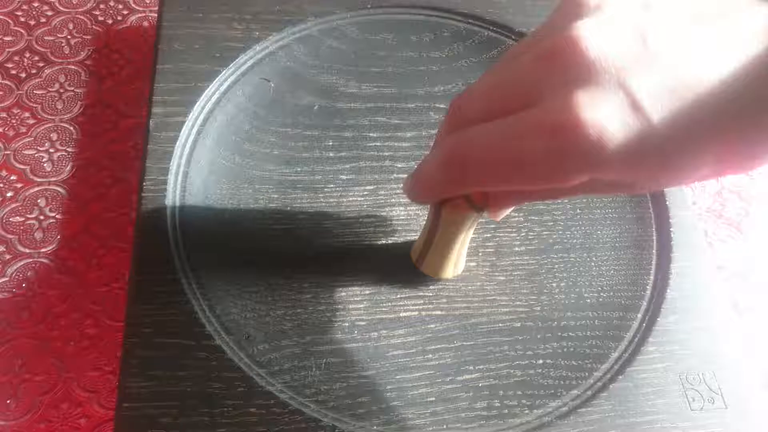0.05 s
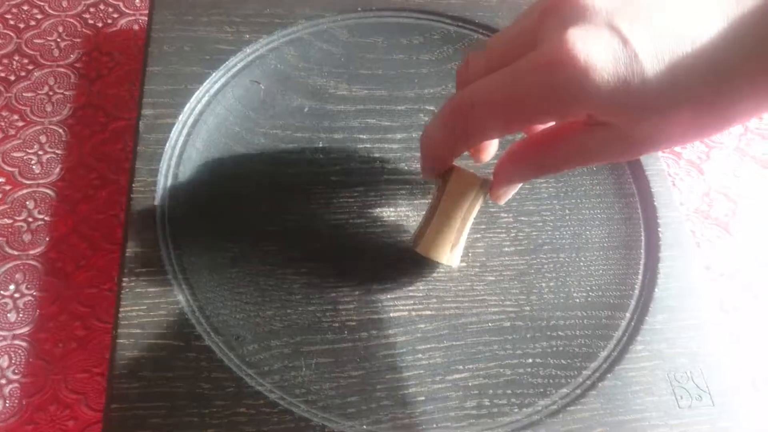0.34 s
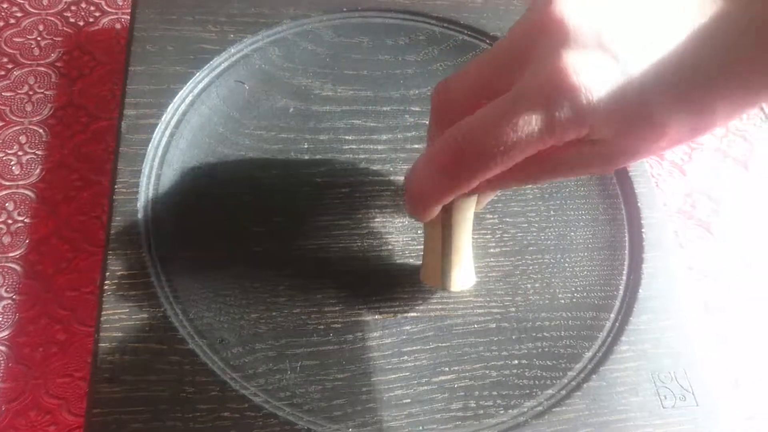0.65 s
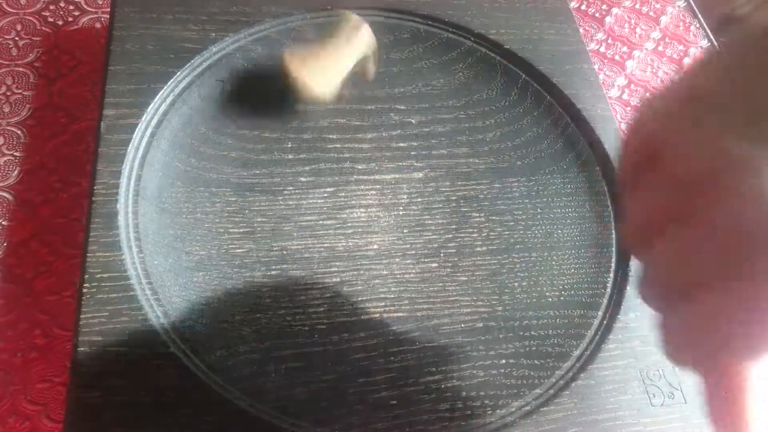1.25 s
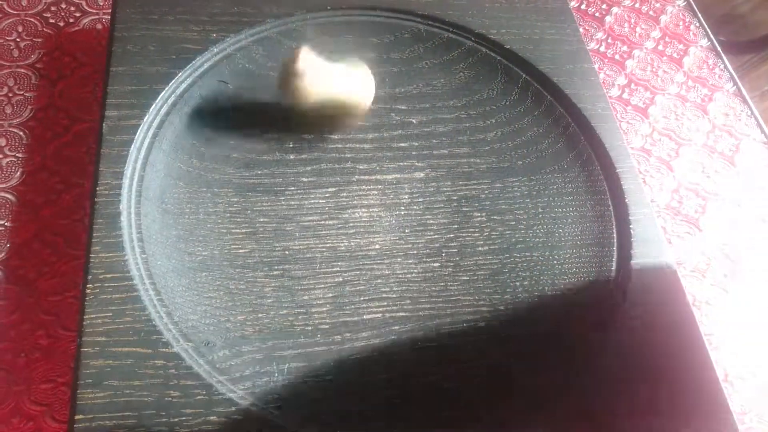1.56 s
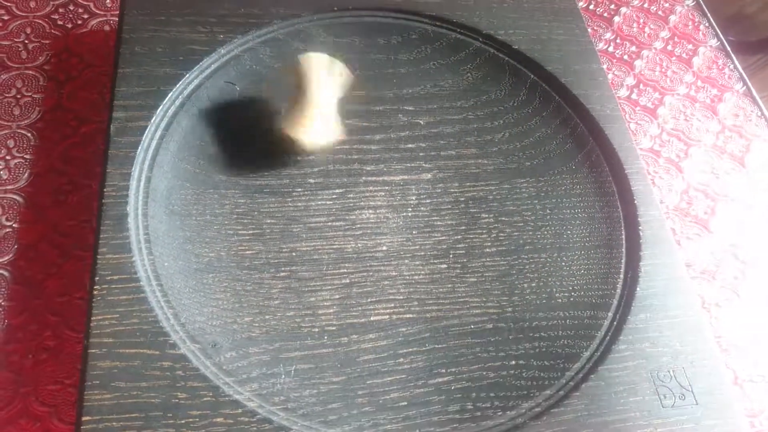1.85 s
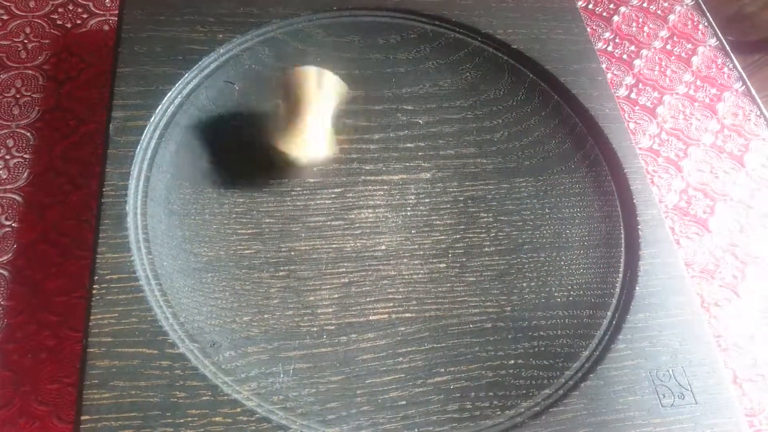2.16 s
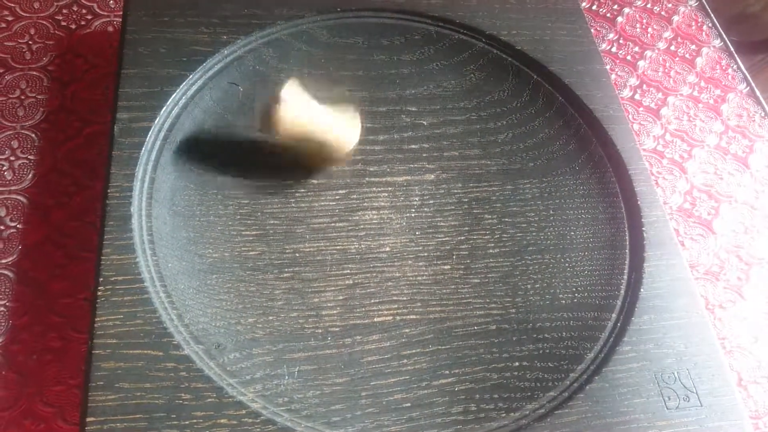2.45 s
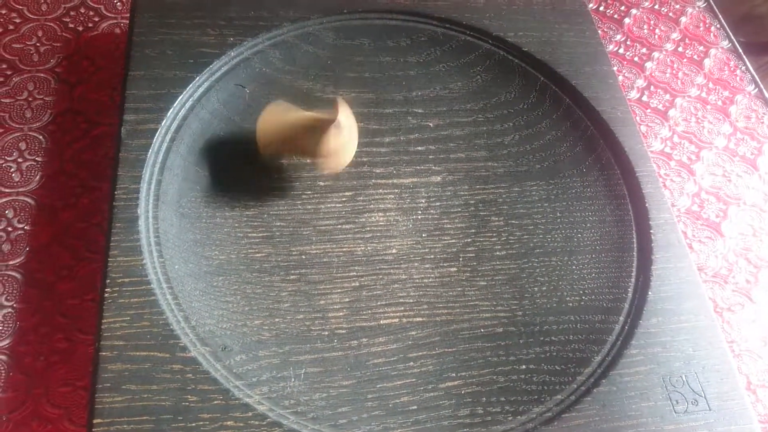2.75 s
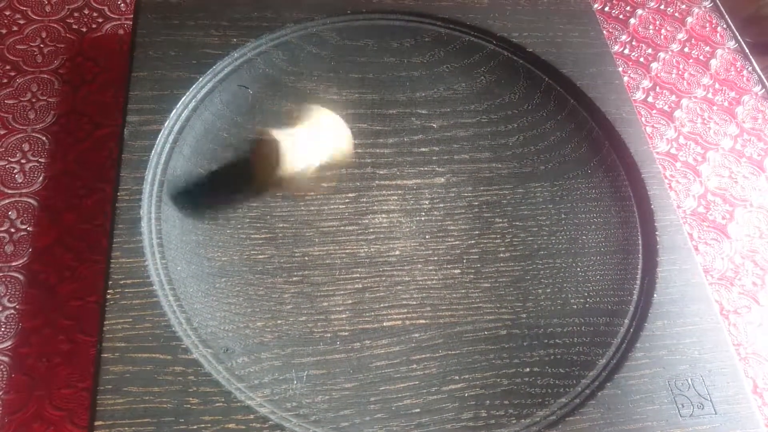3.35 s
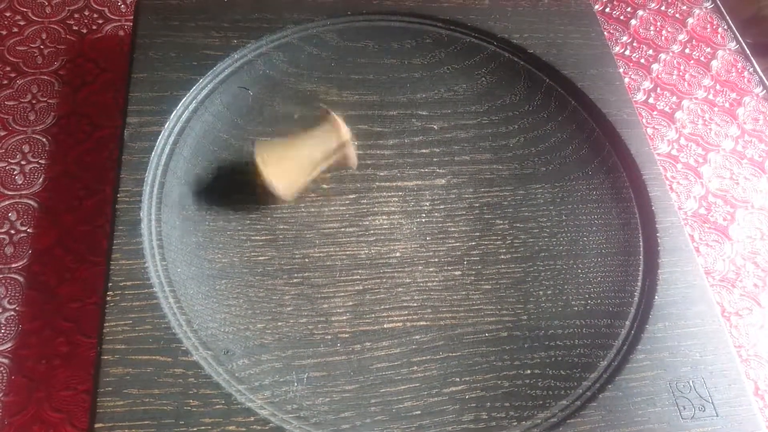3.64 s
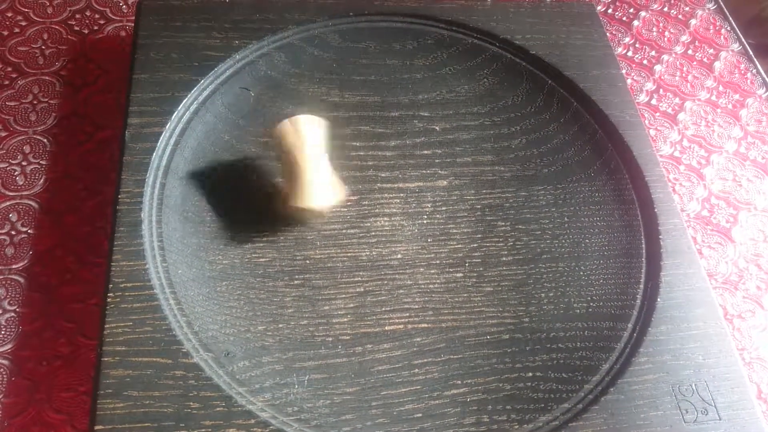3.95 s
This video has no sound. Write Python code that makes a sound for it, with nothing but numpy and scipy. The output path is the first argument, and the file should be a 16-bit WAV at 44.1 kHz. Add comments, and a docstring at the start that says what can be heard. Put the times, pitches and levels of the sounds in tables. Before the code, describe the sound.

Close to the microphone in a quiet room, a wooden top clatters on a wooden plate. Faint finger rubs come first, then three sharp knocks as it lands, followed by quick, uneven tapping as it tumbles around.

```python
"""A small waisted wooden top, flicked by the fingers on a hard wooden plate on a table, close to the
microphones and to the right. After a few soft nudges and rubs it lands with three sharp knocks, then
tumbles round on its rims, tapping and rolling. Every contact rings the top briefly and the plate and
table for longer. Behind it lies a quiet small room with a short tail and a faint hum."""
import sys
import numpy as np
from scipy import signal
from scipy.fft import rfft, irfft
from scipy.io import wavfile

SR = 44100
rng = np.random.default_rng(int(sys.argv[2]) if len(sys.argv) > 2 else 0)


def digitize_waveform(pressure):
    """Quantize a signal to 16-bit integers and store it at the path in sys.argv[1].

    Rows of a 2-D input are taken as channels; values are limited to [-1, 1].
    """
    field = np.atleast_2d(pressure).T
    bounded = np.clip(field, -1, 1)
    quanta = np.round(bounded * 32767).astype(np.int16)
    wavfile.write(sys.argv[1], SR, quanta)


N = 176400
TIME = np.arange(N) / SR

# Room tone. Each row: frequency in Hz, relative spectral level in dB.
ROOM_TONE = [(15, -43), (29, -47), (46, -6), (80, -2), (115, -6), (170, -15), (400, -23), (750, -25.5),
             (1200, -33), (3000, -32.5), (5800, -32), (9000, -36), (15000, -40.5)]
# Faint hum. Each row: frequency in Hz, level in dB.
HUM = [(49, -67), (81, -66)]
# The room's tail. Each row: frequency in Hz, gain in dB, t60 in seconds, right over left in dB.
ROOM_TAIL = [(154, -15, 0.81, 9), (500, -4.5, 0.53, 5.5), (1120, -7, .28, 7.5), (2150, -15.5, 0.44, 14.5),
             (3780, -5.5, 0.58, 18), (5500, -11, 0.71, 12.5), (9400, -11, .083, 12),
             (15100, -0.5, 0.26, -10.5)]
# Early echoes off the plate's rim and the table. Each row: delay in seconds, gain in dB.
ECHOES = [(.0009, -40), (.0017, -13), (.0029, -15)]
# Modes of plate and table. Each row: frequency in Hz, gain at mid run in dB, t60 in seconds,
# right over left in dB, dB gained per second as the top wanders inwards.
PLATE_MODES = [(111.2, -31, 0.082, 1, 3.5), (116.1, -30, 0.21, 5.5, -1), (237, -40.5, 0.032, -3, -7),
               (311, -42.5, 0.33, 13, -5.5), (353.3, -30, 0.098, 7, 1), (376.6, -32.5, 0.077, 13, 1),
               (444.6, -23.5, 0.063, 6.5, 1), (472.5, -28.5, 0.036, 1.5, -0.5),
               (765.7, -32.5, 0.11, 8.5, 5), (876.6, -31, 0.17, 10, 0.5), (928, -24, 0.053, 14, -4),
               (992, -24, 0.053, 17, -1), (1165, -39.5, 0.062, 12, -13), (1252.5, -26, 0.041, 7.5, -6),
               (1418, -39, 0.07, 20, 4), (1554, -33, 0.04, 16, -14), (1741, -21, 0.063, 11, 4),
               (1898, -21.5, 0.033, 14, 2.5), (2410, -32, 0.012, 29, 20.5), (2480, -31.5, .022, 20, -16)]
# The table under a dropped weight. Each row: frequency in Hz, gain in dB, t60 in seconds.
THUD_MODES = [(108.2, -5, 0.27), (186, -9, 0.077), (307, -11, 0.14), (453, -3, 0.059), (594, -22, 0.011),
              (870, -10, 0.036), (950, -17, 0.03)]
# The top struck on its rim. Each row: frequency in Hz, gain in dB, t60 in seconds, right over left in dB.
CLACK_MODES = [(1170, -29, 0.0042, 17), (1786, -17, 0.019, 19), (1957, -14.5, 0.018, 8.5),
               (2312, -2, 0.0083, 17.5), (2544, -8.5, 0.011, 12.5), (2870, -19, 0.0048, 10),
               (3163, -12, 0.012, 8), (3350, -26.5, 0.013, 18), (3990, -18.5, .007, 3.5),
               (5100, -29, 0.013, 9), (5850, -18, 0.0075, 24), (6460, -19, 0.0078, 14),
               (7230, -23.5, 0.0097, 12), (9100, -26, 0.015, -6)]
# The top struck on its end face, ringing along its length. Each row: as for the clack.
END_MODES = [(2640, -2.5, 0.0028, 14), (3430, -4, 0.0047, 15), (4100, -8, 0.0052, 14),
             (5030, -15, 0.017, 22), (5760, -16, 0.015, 9), (6720, -17, 0.013, 28), (7700, -20, 0.0076, 5)]
# Skin rubs on wood. Each row: start, swell and fade in seconds, level in dB, brightness in Hz,
# skin hiss in dB.
RUBS = [(0.429, 0.0062, 0.083, -54.5, 490, -90), (0.673, .002, 0.026, -60, 474, -90),
        (0.855, 0.0022, 0.057, -55, 860, -60.5), (1.167, 0.03, 0.028, -47.5, 875, -52.5)]
# The fingers set the top down, then push it off. Each row: start in seconds, level in dB,
# brightness in Hz, thud in dB.
NUDGES = [(0.818, -63.5, 420, -49.5), (0.858, -52, 850, -47.5), (0.909, -58.5, 500, -47),
          (1.01, -72, 330, -62), (1.198, -51, 445, -42.5)]
# The top lands and bounces. Each row: start in seconds, level in dB, brightness in Hz, crack in dB,
# crack pitch in Hz, thud in dB.
LANDINGS = [(1.326, -15, 6960, -6.5, 5130, -33.5), (1.4117, -2.5, 2800, -0.5, 3450, -39.5),
            (1.483, -7.5, 1840, -14, 3180, -60)]
# A rim taps the plate. Each row: start in seconds, level in dB.
RIM_TAPS = [(1.4406, -22), (1.5183, -22), (1.54, -29), (1.5446, -20.5), (1.5494, -24), (1.5591, -22.5),
            (1.5716, -18.5), (1.6083, -17.5), (1.6296, -16.5), (1.644, -31), (1.6508, -21), (1.6586, -23.5),
            (1.683, -46), (1.705, -16), (1.7168, -20), (1.7305, -28), (1.7446, -25), (1.7689, -29),
            (1.7834, -18.5), (1.802, -19.5), (1.822, -23.5), (1.8356, -23.5), (1.846, -39), (1.865, -33),
            (1.8749, -22.5), (1.8863, -26.5), (1.9036, -30.5), (1.9128, -29), (1.926, -26.5), (1.945, -31),
            (1.9541, -29.5), (1.9849, -30), (1.9947, -22), (2.0073, -27.5), (2.0256, -25), (2.0362, -31.5),
            (2.0501, -32), (2.0623, -30), (2.07, -20), (2.0809, -29), (2.0922, -21), (2.1061, -25.5),
            (2.1477, -29.5), (2.1562, -32), (2.1708, -26.5), (2.1881, -17.5), (2.1996, -23),
            (2.2139, -26.5), (2.2303, -25), (2.2472, -18.5), (2.2572, -18.5), (2.2659, -27), (2.2853, -22),
            (2.3029, -16), (2.3445, -25.5), (2.3547, -32), (2.385, -24.5), (2.4025, -22.5), (2.418, -25.5),
            (2.4308, -20.5), (2.4604, -26.5), (2.4737, -23), (2.4834, -35), (2.49, -22), (2.4976, -29),
            (2.5053, -28.5), (2.5193, -23), (2.5367, -18), (2.5508, -18), (2.5799, -27), (2.64, -27.5),
            (2.6525, -27.5), (2.7123, -24.5), (2.7202, -30), (2.7337, -27), (2.7498, -29), (2.7723, -27),
            (2.7826, -27), (2.7971, -31.5), (2.81, -22), (2.8186, -28.5), (2.8585, -29.5), (2.8698, -25.5),
            (2.8804, -28), (2.8909, -27), (2.913, -34), (2.9211, -34), (2.9291, -30), (2.9375, -24.5),
            (2.9483, -24.5), (2.9593, -29.5), (2.9836, -33), (2.9928, -24), (3.009, -19), (3.022, -20),
            (3.0503, -26), (3.0565, -25), (3.067, -34), (3.105, -24), (3.1183, -20), (3.132, -27),
            (3.1566, -26), (3.1638, -27.5), (3.1722, -27), (3.194, -28), (3.2016, -25.5), (3.2185, -19),
            (3.2282, -24), (3.236, -24), (3.249, -28), (3.2676, -23.5), (3.281, -23), (3.2977, -30),
            (3.3054, -31), (3.3138, -26), (3.3226, -39), (3.333, -18.5), (3.3516, -18.5), (3.3668, -16),
            (3.38, -14), (3.398, -13.5), (3.4193, -18), (3.433, -24.5), (3.45, -11), (3.5052, -37),
            (3.514, -25.5), (3.525, -24), (3.5369, -26.5), (3.5464, -28), (3.556, -36), (3.591, -29),
            (3.6021, -21.5), (3.6204, -15), (3.6356, -17.5), (3.6515, -18), (3.6604, -46), (3.6729, -22),
            (3.6842, -23), (3.6899, -29), (3.705, -28), (3.7122, -25.5), (3.7225, -30), (3.7315, -29),
            (3.7398, -30), (3.7545, -15.5), (3.766, -33), (3.7783, -18), (3.787, -22), (3.7985, -25),
            (3.8124, -24.5), (3.8238, -27), (3.8322, -31), (3.8429, -28), (3.869, -37), (3.8894, -33),
            (3.896, -33), (3.9025, -33.5), (3.9166, -33), (3.9256, -32), (3.9321, -22.5), (3.9425, -27),
            (3.9517, -23), (3.9678, -17), (3.9774, -38), (3.985, -25)]
# The rolling between taps. Each row: time in seconds, vigour in dB.
ROLLING = [(1.32, 17), (1.34, 8.5), (1.405, 2.5), (1.43, 11), (1.55, -3), (1.75, 5.5), (2.05, 4),
           (2.27, 4.5), (2.5, 5), (2.68, 5.5), (2.95, 6.5), (3.2, 3.5), (3.42, 10.5), (3.56, 6), (3.66, 5),
           (3.87, 7.5), (4.0, 3)]

MEAN_TAP_DB, MID_RUN_S, PLATE_LOW_HZ = -25.5, 2.7, 70.6


def from_db(db):
    """Decibels to gain."""
    return 10 ** (np.asarray(db) / 20)


def stereo(db, right_over_left_db):
    """Gains at the left and right microphones; db is the right one's."""
    return from_db([[db - right_over_left_db], [db]])


def cut(x, hz, kind, order=2):
    """Butterworth low- or high-pass."""
    sos = signal.butter(order, np.clip(hz, 10, .45 * SR), kind, fs=SR, output="sos")
    return signal.sosfilt(sos, x + 1e-18)


def ring(push, hz, t60):
    """One mode: a unit click sets a sine of height 1 ringing."""
    r, w = from_db(-60 / (t60 * SR)), 2 * np.pi * hz / SR
    return signal.lfilter([0, np.sin(w)], [1, -2 * r * np.cos(w), r * r], push + 1e-18)


def contacts(starts, db, hz, clack_hz=2300):
    """Force pulses, the shorter the brighter, each with its level set at the clack's pitch."""
    n = np.arange(96)
    decay = 2 * np.pi * np.clip(hz, 300, 15000)[:, None] / SR
    pulse = n * np.exp(-decay * n)
    strength = abs(pulse @ np.exp(-2j * np.pi * clack_hz * n / SR))
    force = np.zeros(N + SR)
    np.add.at(force, (starts * SR).astype(int)[:, None] + n, pulse * (from_db(db) / strength)[:, None])
    return force[:N]


def room_tone(level_db=-63.5, alike_below_hz=800):
    """Low rumble and hum, alike at both microphones, under a faint wide hiss."""
    freqs = np.maximum(np.fft.rfftfreq(N, 1 / SR), 1)
    tone_hz, tone_db = np.transpose(ROOM_TONE)
    colour = from_db(np.interp(np.log(freqs), np.log(tone_hz), tone_db))
    alike = .85 / (1 + (freqs / alike_below_hz) ** 2)
    white = rfft(rng.standard_normal((3, N)))
    noise = irfft((np.sqrt(alike) * white[0] + np.sqrt(1 - alike) * white[1:]) * colour, N)
    hum = sum(from_db(db) * np.sin(2 * np.pi * (hz * TIME + rng.random())) for hz, db in HUM)
    return from_db(level_db) * noise / noise.std() + hum


def room_tail(source, alike_below_hz=2960, build_s=.00066):
    """A diffuse tail dies band by band, leaning right, the bass moving together at both microphones."""
    t, tail = TIME[:SR // 2], 0
    hz, *columns = np.transpose(ROOM_TAIL)
    edges = np.geomspace(80, 16000, 12)
    for low, high in zip(edges, edges[1:]):
        db, t60, right_db = (np.interp(np.log(low * high) / 2, np.log(hz), c) for c in columns)
        envelope = from_db(-60 * t / t60) * (1 - np.exp(-t / build_s))
        alike = 1 / (1 + low * high / alike_below_hz ** 2)
        white = rng.standard_normal((3, len(t)))
        noise = np.sqrt(alike) * white[0] + np.sqrt(1 - alike) * white[1:]
        band = signal.sosfilt(signal.butter(2, [low, high], "band", fs=SR, output="sos"), noise)
        tail = tail + stereo(db, right_db) * band * envelope / np.linalg.norm(envelope)
    return signal.fftconvolve(source[1:], tail, axes=1)[:, :N]


def stroke(start, swell, fade):
    """One slide of a finger: noise that swells and dies away."""
    age = np.maximum(TIME - start, 0)
    envelope = np.minimum(age / swell, 1) ** 2 * np.exp(-np.maximum(age - swell, 0) / fade)
    return envelope * rng.standard_normal(N)


def finger_rubs(skin_hz=5900):
    """Skin sliding on wood: a dull friction force and a stereo hiss."""
    friction = sum(from_db(db) * cut(stroke(*timing), hz, "low", order=4) for *timing, db, hz, _ in RUBS)
    hiss = sum(from_db(db) * np.array([stroke(*timing), stroke(*timing)]) for *timing, _, _, db in RUBS)
    return friction, cut(hiss, skin_hz, "low", order=1)


def table_thud(contact_hz=3000):
    """The weight of each landing and nudge thuds through the table."""
    push = np.zeros(N)
    for start, *_, db in LANDINGS + NUDGES:
        push[int(start * SR)] = from_db(db)
    push = cut(cut(push, contact_hz, "low"), PLATE_LOW_HZ, "high")
    body = sum((-1) ** k * from_db(db) * ring(push, hz, t60) for k, (hz, db, t60) in enumerate(THUD_MODES))
    return stereo(0, 5.5) * body


def plate_ring(starts, db, hz, friction, gain_db=-2.5, spread_db=3.5):
    """Contacts and friction ring the plate; each contact meets every mode with a strength of its own."""
    # Harder blows are shorter, so the plate takes up only a share of their extra level, up to a limit.
    taken_db = np.minimum(db, MEAN_TAP_DB + .54 * (db - MEAN_TAP_DB)).clip(max=-18)
    scatter_db = spread_db * rng.standard_normal((len(starts), len(PLATE_MODES)))
    out = np.zeros((2, N))
    for k, (mode_hz, mode_db, t60, right_db, drift) in enumerate(PLATE_MODES):
        push = contacts(starts, taken_db + drift * (starts - MID_RUN_S) + scatter_db[:, k], hz) + friction
        out += (-1) ** k * stereo(mode_db, right_db) * ring(push, mode_hz, t60)
    return from_db(gain_db) * cut(out, PLATE_LOW_HZ, "high")


def rim_skid(starts, db, hz, gain_db=-12.5, fade_s=.0024, low_hz=3360, high_hz=5930):
    """The rim skids a little at every contact: a bright scrape, stronger where the contact is hard."""
    force = abs(cut(contacts(starts, db, hz), low_hz, "high"))
    envelope = signal.lfilter([1], [1, -np.exp(-1 / (fade_s * SR))], force)
    scrape = cut(envelope * rng.standard_normal((2, N)), low_hz, "high")
    return stereo(gain_db, 8) * cut(scrape, high_hz, "low", order=5)


def landing_crack(width_octaves=.48):
    """Falling on its end face, the top cracks; each landing favours the modes near its crack pitch."""
    starts, _, _, db, pitch, _ = np.transpose(LANDINGS)
    out = np.zeros((2, N))
    for k, (hz, mode_db, t60, right_db) in enumerate(END_MODES):
        nearness = np.exp(-.5 * (np.log2(hz / pitch) / width_octaves) ** 2)
        push = np.zeros(N)
        push[(starts * SR).astype(int)] = from_db(db) * nearness
        out += (-1) ** k * stereo(mode_db, right_db) * ring(push, hz, t60)
    return out


def rim_clack(starts, db, hz, friction, points=6, spread_db=5.5, detune=.031, gain_db=-.5):
    """Wood on wood: a blow meets one of a few rim points, equally loud, each with its own tuning and mix."""
    chance = rng.standard_normal((points, len(CLACK_MODES), 2))
    chance -= chance.mean(axis=0)
    chance[0] = 0  # point 0 rings the plain modes and takes the landings, nudges and friction
    energy = [from_db(2 * mode_db) * t60 for _, mode_db, t60, _ in CLACK_MODES]
    strength = np.sqrt(np.average(from_db(2 * spread_db * chance[:, :, 1]), axis=1, weights=energy))
    struck = rng.integers(0, points, len(starts))
    struck[:len(LANDINGS + NUDGES)] = 0
    out = np.zeros((2, N))
    for point in range(points):
        here = struck == point
        push = contacts(starts[here], db[here], hz[here]) / strength[point] + friction * (point == 0)
        for (mode_hz, mode_db, t60, right_db), (sharper, louder) in zip(CLACK_MODES, chance[point]):
            gain = stereo(mode_db + spread_db * louder, right_db)
            out += gain * ring(push, mode_hz * (1 + detune * sharper), t60)
    out[0] = np.roll(out[0], -int(.0001 * SR))  # the left channel leads slightly
    out += sum(from_db(echo_db) * np.roll(out, int(delay * SR), axis=1) for delay, echo_db in ECHOES)
    return from_db(gain_db) * cut(cut(out, 1254, "high", order=3), 9050, "low", order=4)


def blows(vigour_db, tap_hz=2370, chatter_per_s=260, chatter_hz=2010):
    """Landings, nudges, rim taps and faint rolling chatter: starts in s, levels in dB, brightness in Hz."""
    starts, db = np.transpose(RIM_TAPS)
    # Stronger taps are brighter, with some scatter.
    hz = tap_hz * from_db(.28 * (db - MEAN_TAP_DB) - 1.5 * rng.standard_normal(len(starts)))
    at = np.flatnonzero((rng.random(N) < chatter_per_s / SR) & (TIME > ROLLING[0][0]))
    chatter_db = -45 + vigour_db[at] + 4.5 * np.clip(rng.standard_normal(N)[at], -2, 2)
    chatter = np.c_[at / SR, chatter_db, np.full(len(at), chatter_hz)]
    return np.vstack([[row[:3] for row in LANDINGS + NUDGES], np.c_[starts, db, hz], chatter]).T


def tumbling_top(rumble_hz=860, hiss_above_hz=6400):
    """Blows, rolling and finger rubs sound through top, plate and table; a thin hiss follows the run."""
    vigour_db = np.interp(TIME, *np.transpose(ROLLING), left=-120)
    rumble = from_db(vigour_db - 53.5) * cut(rng.standard_normal(N), rumble_hz, "low", order=1)
    rubs, skin = finger_rubs()
    hiss = from_db(vigour_db / 2 - 71.5) * cut(rng.standard_normal((2, N)), hiss_above_hz, "high")
    hits = blows(vigour_db)
    top = rim_clack(*hits, friction=from_db(-22) * skin[1]) + landing_crack() + rim_skid(*hits)
    support = plate_ring(*hits, friction=rumble + rubs) + table_thud()
    return top + support + hiss + skin


def scene():
    """The top, close by and to the right, in its quiet room."""
    background = room_tone()
    top = tumbling_top()
    return top + room_tail(top) + background


def record(dry, open_s=.12, ceiling=.71, cutoff_hz=15400):
    """The microphones open after a moment; the hardest knock is rounded off and the top treble is cut."""
    fade_in = np.clip((TIME - open_s) / .005, 0, 1)
    rounded = ceiling * np.tanh(dry * fade_in / ceiling)
    return signal.sosfilt(signal.ellip(10, .1, 70, cutoff_hz, fs=SR, output="sos"), rounded)


dry = scene()
out = record(dry)
digitize_waveform(out)
```